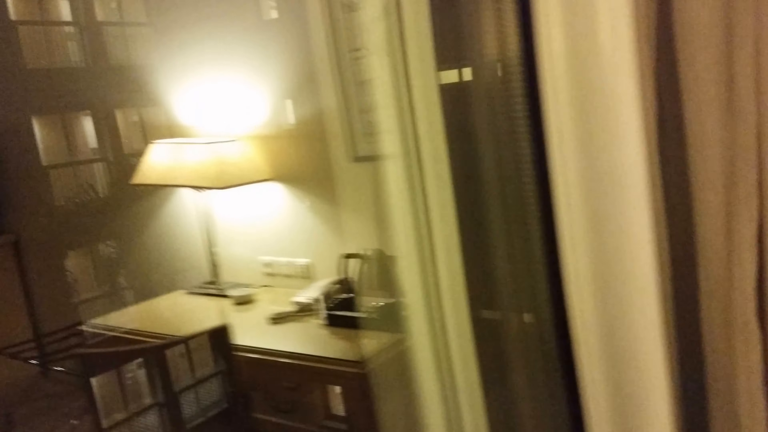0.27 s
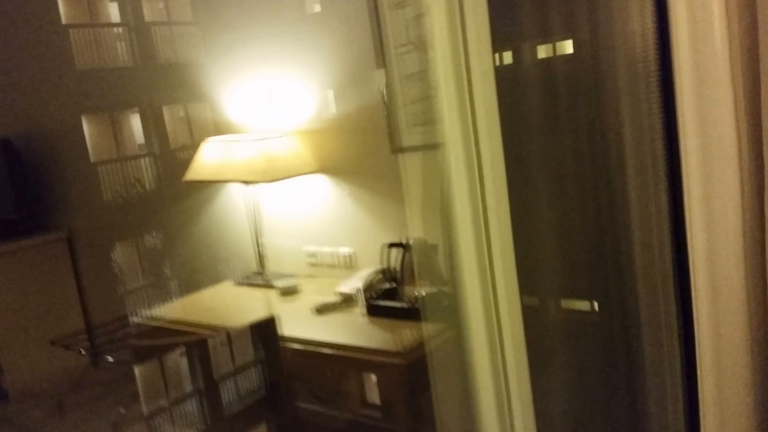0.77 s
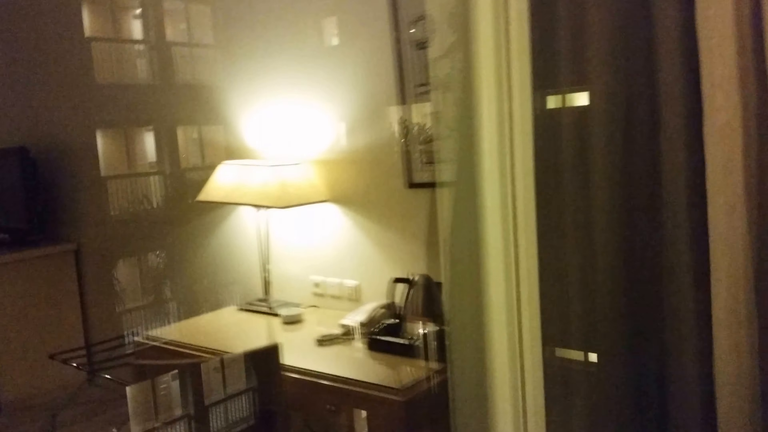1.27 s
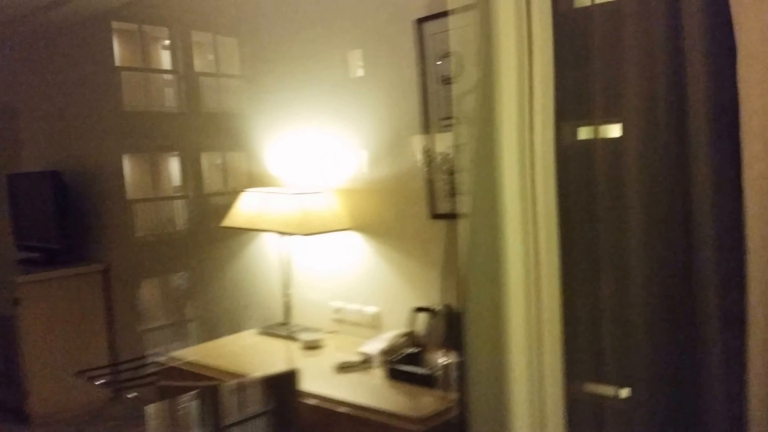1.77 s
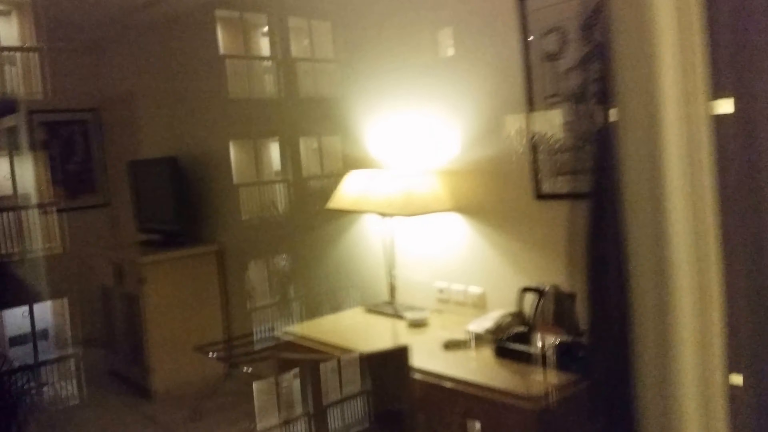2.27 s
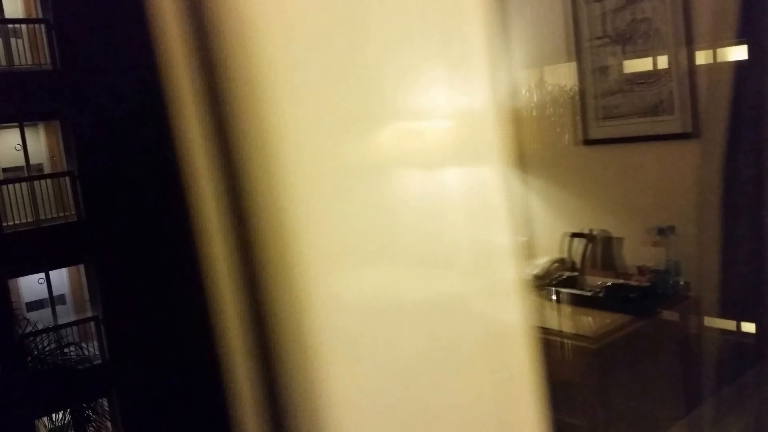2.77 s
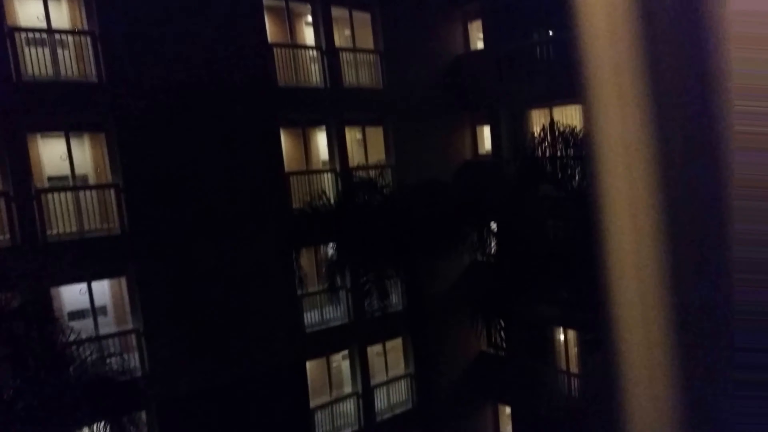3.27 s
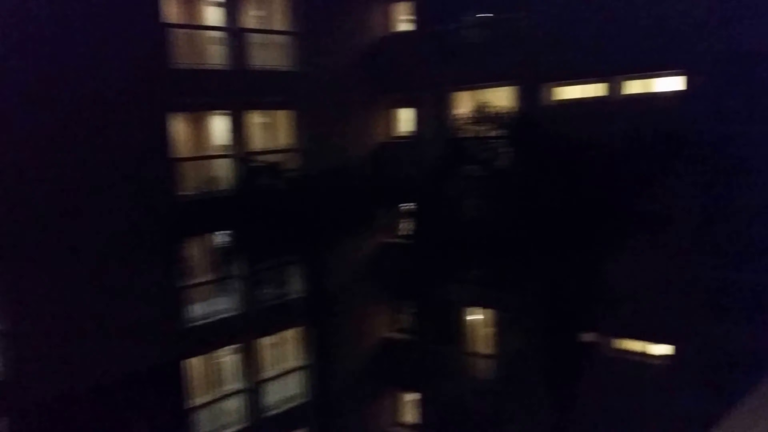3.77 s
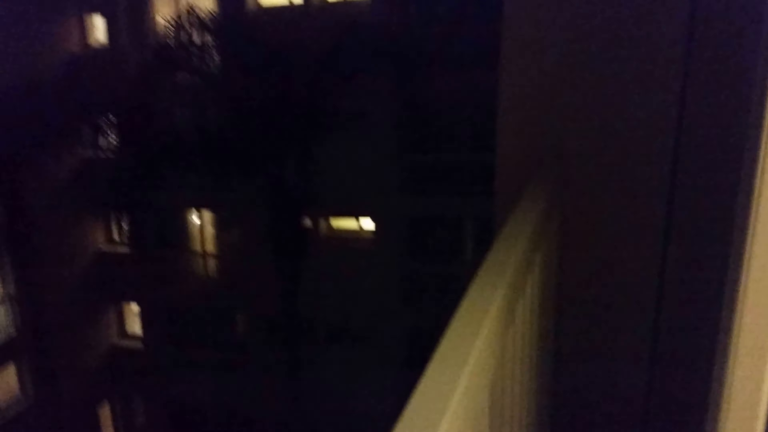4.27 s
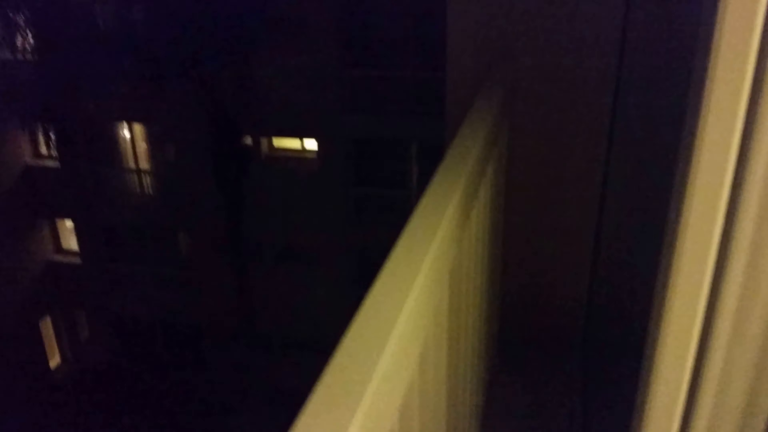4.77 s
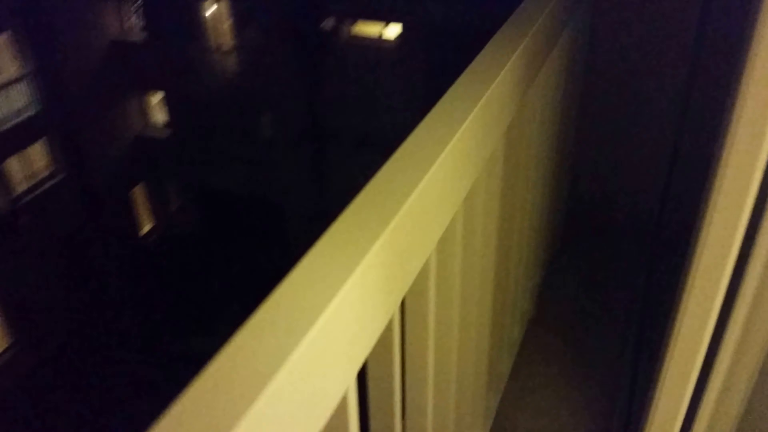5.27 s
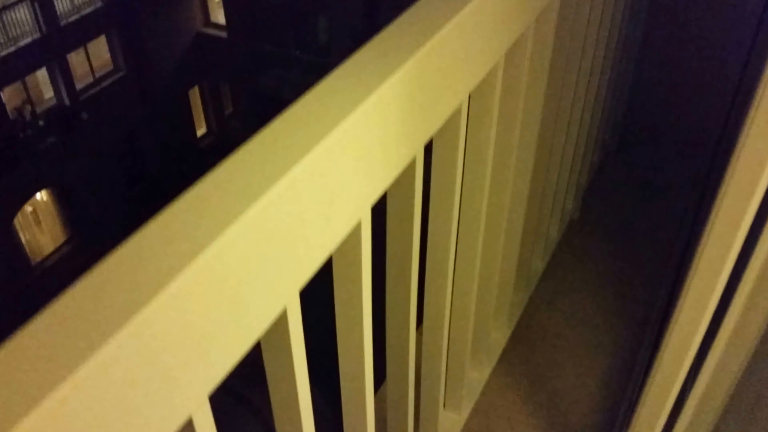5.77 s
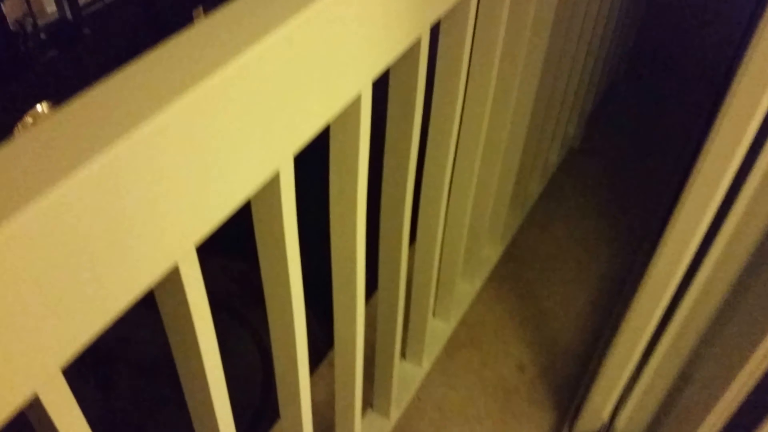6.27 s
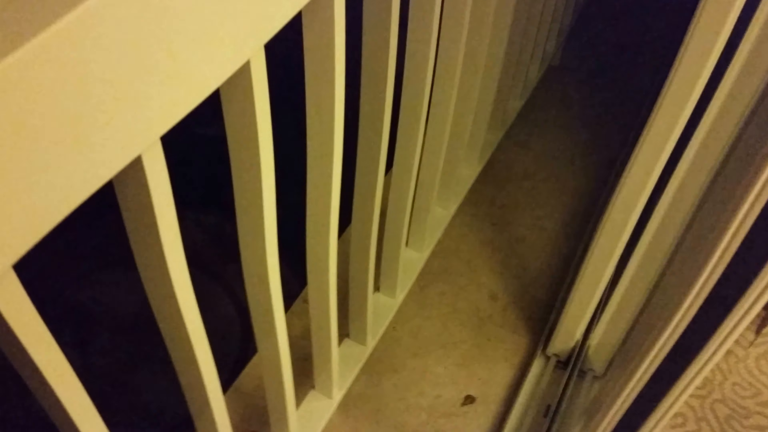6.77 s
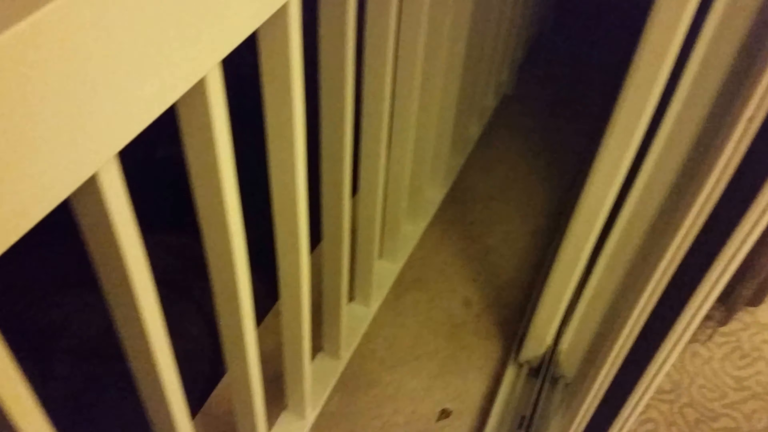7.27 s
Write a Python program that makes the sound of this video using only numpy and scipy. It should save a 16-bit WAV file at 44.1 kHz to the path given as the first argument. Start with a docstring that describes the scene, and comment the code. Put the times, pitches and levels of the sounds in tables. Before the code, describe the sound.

In a hotel room, a curtain brushes briefly as a glass balcony door rolls along its track, low rumble and brushy hiss swelling under thin, fluttering squeals. The frame clacks sharply on its stop and rings briefly. Stepping outside, the handheld stereo microphone meets low courtyard rumble, fan drone and airy hiss, with small taps, faint cloth and finally a dull hollow knock.

```python
"""In a hotel room, a sliding glass balcony door rolls open: its wheels drum the pane with filtered noise,
the brush seal hisses, and the track squeals with wandering sine tones. Bursts of noise and ringing notes make
the frame clack against its stop. The listener moves out into the night-time courtyard, made of rumbling noise,
droning fans and airy hiss. Light noise-and-note taps and soft cloth swishes are heard, then a hollow knock on
the door frame, made of dying notes and noise."""
import sys
import numpy as np
from scipy import signal
from scipy.fft import rfft, irfft
from scipy.io import wavfile

SR = 44100
rng = np.random.default_rng(int(sys.argv[2]) if len(sys.argv) > 2 else 0)


def store_pcm(level_fs):
    """Save levels as 16-bit WAV."""
    pcm = np.round(np.clip(level_fs, -1, 1) * 32767).astype(np.int16)
    wavfile.write(sys.argv[1], SR, np.atleast_2d(pcm).T)


N = 331632
T = np.arange(N) / SR  # time of each sample, s
HZ = np.maximum(np.arange(N // 2 + 1) * SR / N, 1)  # frequencies used by the filters

# Colour and mode levels are relative, and their sounds set the loudness; cloth and tap levels are used
# as they stand.
# tone colour of the pane, drummed by the wheels: f/Hz, level/dB
PANE_COLOUR = [(15, -42), (25, -15.5), (43, -12.5), (82, -0.5), (156, -2), (258, -12.5), (284, -12),
               (334, -23.5), (386, -17.5), (426, -47.5), (484, -21.5), (560, -47), (628, -31), (1200, -40),
               (1560, -70), (2640, -120)]
# tone colour of the brush seal on the aluminium track: f/Hz, level/dB
SEAL_COLOUR = [(300, -22), (520, -3), (900, -2), (1500, -6), (2150, -6), (2900, -16), (4500, -22),
               (5400, -17.5), (6500, -21), (8100, -21), (9500, -15.5), (12200, -17), (13800, -19),
               (16000, -18.5)]
# the wheels jolt on uneven spots of the track: t/s, level/dB
TRACK_JOLTS = [(0.0, -30.5), (1.49, -32.5), (1.876, -29), (2.04, -32.5)]
# cloth brushes past, first the curtain, then a sleeve: t/s, length/s, level/dB, centre f/Hz, width/octaves
CLOTH_SWISHES = [(-.2, 0.4, -52, 1560, 0.21), (-.2, 0.35, -43.5, 2340, 1.22), (3.494, 0.42, -76, 4200, 1.2),
                 (3.578, 0.28, -56, 1190, 0.33), (5.517, 0.21, -65.5, 5100, 0.44),
                 (5.48, 0.28, -74.5, 11400, 0.53), (5.656, 0.29, -72.5, 10250, .4)]
# tone colour of the traffic rumble: f/Hz, level/dB
RUMBLE_COLOUR = [(12, -58.5), (20, -22.5), (32, -14.5), (51, -10), (109, -3.5), (184, -11), (266, -11.5),
                 (435, -20), (505, -26.5), (577, -26), (700, -32.5), (910, -54.5), (1540, -120)]
# ventilation fans: f/Hz, width/Hz, level/dB
FAN_BANDS = [(62, 7.2, -8.5), (112.7, 11, 0), (221.3, 5, -6), (267.5, 2.4, -8.5)]
# tone colour of the airy outdoor hiss: f/Hz, level/dB
AIR_COLOUR = [(350, -28), (600, -3.5), (920, -2), (1300, -7), (1520, -10), (2100, -9), (2800, -23.5),
              (4400, -35.5), (5350, -33.5), (6300, -41.5), (8300, -49.5), (10500, -43.5), (13000, -42),
              (15500, -33)]
# one wheel catches and shrieks: t/s, length/s, f/Hz, level/dB
SHRIEK_CATCHES = [(.015, .085, 9100, -44), (.135, 0.12, 9500, -46), (.271, .1, 10000, -43.5),
                  (.385, 0.07, 10500, -40), (.486, 0.12, 11100, -47), (.565, 0.11, 10900, -34.5),
                  (.728, 0.068, 11450, -36.5), (.8, 0.41, 12200, -54.5), (1.096, 0.12, 12100, -47.5),
                  (1.2, .22, 12500, -59), (1.76, .71, 9750, -56.5), (2.044, .23, 9550, -56)]
# close notes inside the shriek: share of the pitch, level/dB
SHRIEK_STRANDS = [(.945, -4), (1., 0.5), (1.055, -5)]
# the other wheel whistles: t/s, length/s, level/dB
WHISTLE_CATCHES = [(.39, 0.2, -68), (.575, 0.076, -56), (.665, 0.1, -50), (.77, 0.14, -55.5),
                   (.92, 0.11, -53), (1.025, 0.12, -50), (1.15, .37, -53), (1.5, .22, -60), (1.7, .05, -54)]
# the frame meets its stop and chatters: t/s, level/dB
STOP_CONTACTS = [(2.4225, -34), (2.465, -27), (2.4765, -10.5), (2.4778, 1), (2.4793, 2), (2.4843, -6),
                 (2.4895, -16)]
# ringing notes of the metal frame: f/Hz, level/dB, time to fall 60 dB/s
FRAME_MODES = [(280, -17.5, .3), (487, -19.5, 0.29), (666, -8, .2), (990, -9, 0.22), (1270, -17, 0.252),
               (1580, -24.5, .25), (1986, -3.5, 0.21), (2087, -1, 0.16), (2367, 4, 0.18), (2450, -7, .17),
               (2780, -21.5, 0.13), (5636, -23.5, .15)]
# tone colour of metal striking metal: f/Hz, level/dB
CRACK_COLOUR = [(150, -33.5), (300, -17), (1000, -2.5), (1700, -7.5), (2200, 5.5), (3000, -25), (3850, -12),
                (4700, -26), (5500, -7), (6500, -24.5), (7400, -18), (11500, -19), (16000, -25)]
# tone colour of the room's answer: f/Hz, level/dB
ROOM_COLOUR = [(180, -39), (300, -13.5), (478, -8), (900, -4), (1080, -12), (1230, -10), (1480, -8),
               (2440, -4.5), (3240, -21), (5430, -17), (6410, -21), (12700, -25), (16000, -38.5)]
# light taps: t/s, level/dB, ring f/Hz, ring level/dB, tilt/(dB per octave), time to fall 60 dB/s
LIGHT_TAPS = [(3.305, -40, 646, -5, -2.5, .08), (3.6, -48, 1130, 6, 5, .2), (3.685, -55, 1130, 7, 0, .3),
              (3.973, -24, 900, -12, -2.5, .035), (3.9845, -29, 520, -9, -3.5, .07),
              (6.005, -43, 560, -3, -1, .25), (6.154, -41, 606, -5, -1, .05)]
# tone colour of a tap before its tilt: f/Hz, level/dB
TAP_NOISE_COLOUR = [(120, -12), (330, -2), (950, 1), (1500, -4), (2300, -13), (3300, -27), (5500, -35),
                    (8000, -46), (15000, -58)]
# contacts in the hollow knock's rattle: t/s, level/dB
KNOCK_CONTACTS = [(6.7185, 5.5), (6.7325, 5), (6.7505, -8), (6.764, -20)]
# ringing notes of the hollow sill: f/Hz, level/dB, time to fall 60 dB/s
SILL_MODES = [(173.6, -12, 0.25), (319, -6.5, 0.32), (463, -3, 0.3), (518, -1.5, 0.44), (571, -0.5, 0.33),
              (610, -9, 0.3), (646, -13, 0.16), (940, -6, 0.26), (1123, -14, 0.36), (1350, -17, 0.25),
              (1395, -16, 0.1)]
# tone colour of the knock's noise: f/Hz, level/dB
KNOCK_NOISE_COLOUR = [(150, -16), (300, -7), (540, 5), (750, -10.5), (1350, -7), (1650, -19), (2900, -27.5),
                      (3500, -40.5), (5600, -33.5), (8500, -50), (15500, -58)]
# difference in tone between the two microphone ports: f/Hz, left minus right level/dB
PORT_BALANCE = [(60, 0.5), (110, 3.5), (200, 2), (380, 4), (700, 3), (1290, -0.5), (2380, -1.5),
                (4400, 0.5), (8120, -2), (15000, -1)]

# one shove swells and ebbs, then the door coasts to its stop
PUSH_S, PUSH_WIDTH_S, STOP_S = .7, .58, 2.478
COAST_DB, PUSH_DB = -38.5, 10.5  # wheel rumble while coasting, before its trim; what the shove adds
SEAL_DB, SEAL_PUSH_DB = -51, 1.94  # the same for the seal's hiss
JOLT_T60_S = 0.6
# the courtyard grows as the gap widens, and again as the listener crosses the threshold
GAP_OPENS_S, GAP_LENGTH_S = 1.5, .8
STEP_OUT_S, STEP_LENGTH_S = 3.384, .33
# out of doors; change in the doorway; further change behind the shut door
RUMBLE_DB, RUMBLE_DOORWAY_DB, RUMBLE_SHUT_DB = -36.5, -5, -1.5
AIR_DB, AIR_DOORWAY_DB, AIR_SHUT_DB = -49.3, -7, -16
SQUEAL_RISE = 0.029  # share by which the pitch climbs during a catch
# the whistle's pitch climbs as the wheel runs in, and levels off
WHISTLE_START_HZ, WHISTLE_TOP_HZ, WHISTLE_CLIMB_S, WHISTLE_SETTLE_S = 6280, 7460, .6, .2
TOP_HZ = 15800  # the treble is cut above this


def undb(db):
    """Turn decibels into gain."""
    return 10 ** (np.asarray(db) / 20)


def unit(x):
    """Scale to an average (rms) strength of 1."""
    return x / np.sqrt(np.mean(x ** 2))


def gains(points):
    """Draw a gain for every frequency through (f/Hz, level/dB) points."""
    hz, db = np.transpose(points)
    return undb(np.interp(np.log(HZ), np.log(hz), db))


def shape(x, gain):
    """Filter by a gain at every frequency."""
    return irfft(rfft(x) * gain, N)


def walk(rate):
    """Smooth random wandering with spread 1 that changes about rate times a second."""
    return unit(shape(rng.standard_normal(N), np.exp(-(HZ / rate) ** 2)))


def noise(gain, spread):
    """Coloured stereo noise; spread sets how much the sides differ, growing towards the treble."""
    mid, side = rng.standard_normal((2, N))
    side = shape(side, np.minimum(spread * (1 + HZ / 2500), 1))
    return unit(shape(mid + np.array([side, -side]), gain))


def decay(t, t60):
    """Die away by 60 dB in t60 seconds."""
    return np.exp(-np.log(1000) * t / t60)


def fade(t60, start=0, attack=0.00023):
    """A quick start that dies away by 60 dB in t60 seconds."""
    t = np.maximum(T - start, 0)
    return (1 - np.exp(-(t / attack) ** 2)) * decay(t, t60)


def ramp(start, length):
    """Rise from 0 to 1 and stay there."""
    return np.clip((T - start) / length, 0, 1)


def swell(start, length):
    """A rounded rise and fall."""
    return np.sqrt(np.abs(np.sin(np.pi * ramp(start, length))))


def catches(rows):
    """Join overlapping swells from (t/s, length/s, level/dB) rows into one loudness curve."""
    return np.sqrt(sum((undb(db) * swell(s, length)) ** 2 for s, length, db in rows))


def tone(hz):
    """A sine wave on a moving pitch."""
    return np.sin(2 * np.pi * np.cumsum(hz) / SR)


def convolve(x, response):
    """Pass a sound through an echo pattern."""
    return signal.fftconvolve(np.atleast_2d(x), np.atleast_2d(response), axes=-1)[:, :N]


def pan(x, db):
    """Make the left louder than the right by db; a negative value leans right."""
    return x * undb(np.array([[db], [-db]]) / 2)


def from_left(x, lag_s, onset_hz=900):
    """Place a source to the left: its sound reaches the right later, most of all in the treble."""
    lag = 2 * np.pi * HZ * lag_s * (1 - 0.74 * np.exp(-(HZ / onset_hz) ** 2))
    return shape(x, np.exp(-1j * np.array([0 * lag, lag])))


def blows(contacts, modes, crack_t60):
    """The hardest contact sets the notes ringing; all contacts shape the loudness of the chatter."""
    hz, db, t60 = np.transpose(modes)[:, :, None]
    hardest_s = max(contacts, key=lambda row: row[1])[0]
    t = np.maximum(T - hardest_s, 0)
    phase = rng.uniform(0, 2 * np.pi, hz.shape)
    ring = np.sum(undb(db) * np.sin(2 * np.pi * hz * t + phase) * decay(t, t60), 0)
    chatter = np.sqrt(sum((undb(size_db) * fade(crack_t60, s)) ** 2 for s, size_db in contacts))
    return ring * (1 - np.exp(-t / 0.0011)), chatter  # the ring builds up softly


def cloth(grain_db=2):
    """Fabric brushes past: grainy noise is narrowed to a band and swells softly."""
    out, fibres = 0, noise(1, spread=0.59) * undb(grain_db * walk(130))
    for s, length, db, hz, octaves in CLOTH_SWISHES:
        stroke = swell(s, length) ** 4
        band = np.exp(-(np.log2(HZ / hz) / octaves) ** 2)
        out = out + undb(db) * stroke * unit(shape(fibres, band))
    return out


def rolling(rumble_db=-1, bump_db=1.3, grit_db=1):
    """Wheels bump along the track and drum the pane; the seal hisses; both die away at the stop."""
    push = np.exp(-((T - PUSH_S) / PUSH_WIDTH_S) ** 2)
    moving = undb(-85 * np.maximum(T - STOP_S, 0))  # falls by 85 dB per second after the stop
    jolts = sum(undb(db) * fade(JOLT_T60_S, s, attack=.006) for s, db in TRACK_JOLTS)
    wheels = np.hypot(undb(COAST_DB + PUSH_DB * push), jolts)
    bumps = undb(rumble_db + bump_db * walk(9.6))
    rumble = noise(gains(PANE_COLOUR), spread=0.18) * wheels * bumps
    rubbing = undb(SEAL_DB + SEAL_PUSH_DB * push + grit_db * walk(40))
    hiss = noise(gains(SEAL_COLOUR), spread=0.39) * rubbing
    return moving * (rumble + hiss)


def courtyard(throb_db=1.25, fan_db=-5):
    """Traffic rumble and droning fans, both noise, with an airy hiss that opens up out of doors."""
    shut = 1 - ramp(GAP_OPENS_S, GAP_LENGTH_S)
    indoors = 1 - ramp(STEP_OUT_S, STEP_LENGTH_S)
    low_db = RUMBLE_DB + RUMBLE_DOORWAY_DB * indoors + RUMBLE_SHUT_DB * shut
    high_db = AIR_DB + AIR_DOORWAY_DB * indoors + AIR_SHUT_DB * shut
    rumble = noise(gains(RUMBLE_COLOUR), spread=0.26) * undb(throb_db * walk(10))
    fan_gain = sum(undb(db) * np.exp(-((HZ - hz) / width) ** 2) for hz, width, db in FAN_BANDS)
    fans = noise(fan_gain, spread=0.24)  # narrow bands of noise throb by themselves
    air = noise(gains(AIR_COLOUR), spread=0.45) * undb(.5 * walk(6))
    return undb(low_db) * (rumble + undb(fan_db) * fans) + undb(high_db) * air


def shrieking(skirt_db=-9):
    """One wheel sticks and slips, making close, fluttering notes roughened by grit."""
    flutter, rasp = .018, .014  # slow and fast pitch wobble, as shares of the pitch
    pitch = np.full(N, float(SHRIEK_CATCHES[0][2]))
    for s, length, hz, db in SHRIEK_CATCHES:
        pitch = np.where(T >= s, hz * (1 + SQUEAL_RISE * (ramp(s, length) - .5)), pitch)
    notes = 0
    for share, db in SHRIEK_STRANDS:
        wobble = 1 + flutter * walk(55) + rasp * walk(1200)
        notes = notes + tone(share * pitch * wobble) * undb(db + 4.0 * walk(60))
    skirt = tone(pitch) * walk(1600)  # grit on the track
    grip = catches((s, length, db) for s, length, hz, db in SHRIEK_CATCHES)
    return (unit(notes) + undb(skirt_db) * skirt) * grip


def whistling():
    """The other wheel sticks and slips, making one wavering tone that climbs and levels off."""
    wander, waver, rough = .014, .011, .021  # slow to fast pitch wobble, as shares of the pitch
    settle = np.exp(-np.maximum(T - WHISTLE_CLIMB_S, 0) / WHISTLE_SETTLE_S)
    pitch = WHISTLE_TOP_HZ + (WHISTLE_START_HZ - WHISTLE_TOP_HZ) * settle
    wobble = 1 + wander * walk(9.2) + waver * walk(40) + rough * walk(900)
    return unit(tone(pitch * wobble) * undb(3.2 * walk(35))) * catches(WHISTLE_CATCHES)


def squealing(echo_db=-4, shriek_db=-2.5, whistle_db=-3.0):
    """Both squealing wheels sound together; the room smears them with a dying noise echo."""
    direct = shrieking() * undb(shriek_db) + whistling() * undb(whistle_db)
    walls = noise(1, spread=0.73) * fade(0.29)
    return direct + undb(echo_db) * convolve(direct, unit(walls) / np.sqrt(N))


def door_stop(ring_db=-22, crack_db=-13.8, room_db=-28.4, rattle_db=-24, rattle_hz=1200,
              crack_t60=0.035, rattle_t60=0.28, room_t60=0.55, left_db=-1.0):
    """The frame clacks on its stop, rings and rattles briefly and wakes the room."""
    ring, contact = blows(STOP_CONTACTS, FRAME_MODES, crack_t60)
    crack = noise(gains(CRACK_COLOUR), spread=.3) * contact
    rattle_band = np.exp(-(np.log2(HZ / rattle_hz) / 0.84) ** 2)
    rattle = noise(rattle_band, spread=0.58) * fade(rattle_t60, 2.479)
    room = noise(gains(ROOM_COLOUR), spread=0.4) * fade(room_t60, 2.484)
    clack = undb(ring_db) * ring + undb(crack_db) * crack
    return pan(clack + undb(rattle_db) * rattle + undb(room_db) * room, left_db)


def taps():
    """Each tap is a short burst of noise with one note ringing in it."""
    out, burst = 0, noise(gains(TAP_NOISE_COLOUR), spread=0.069)
    for s, db, hz, ring_db, tilt_db, t60 in LIGHT_TAPS:
        click = unit(shape(burst, undb(tilt_db * np.log2(HZ / 1000))))
        note = undb(ring_db) * np.sin(2 * np.pi * hz * (T - s))
        out = out + undb(db) * fade(t60, s, attack=0.0015) * (click + note)
    return out


def sill_knock(start=6.7145, ring_db=-23, crack_db=-23, tail_db=-27, thump_db=-14, thump_hz=520,
               crack_t60=0.087, tail_t60=.5):
    """A dull knock on the hollow frame: a few strong swings, a rattle, the echo of the balcony walls."""
    ring, contact = blows(KNOCK_CONTACTS, SILL_MODES, crack_t60)
    thump = np.square(swell(start, 0.0047)) * np.sin(2 * np.pi * thump_hz * (T - start))
    colour = gains(KNOCK_NOISE_COLOUR)
    crack = noise(colour, spread=0.55) * contact
    tail = noise(colour / (1 + HZ / 4000), spread=0.73) * fade(tail_t60, 6.72, attack=.004)
    return undb(ring_db) * ring + undb(thump_db) * thump + undb(crack_db) * crack + undb(tail_db) * tail


def scene(door_lag_s=.00033, yard_lag_s=.00041, knock_lag_s=0.00024):
    """Door, courtyard and knock come from the left; taps and cloth come from straight ahead."""
    door = from_left(rolling() + squealing() + door_stop(), door_lag_s)
    yard = from_left(courtyard(), yard_lag_s)
    knock = from_left(sill_knock(), knock_lag_s)
    return door + yard + knock + taps() + cloth()


def record(dry):
    """Two microphone ports colour the sound differently, and a steep filter cuts the top."""
    lean = np.sqrt(gains(PORT_BALANCE))
    heard = shape(dry, np.array([lean, 1 / lean]))
    low_pass = signal.ellip(10, .2, 90, TOP_HZ, fs=SR, output="sos")
    return signal.sosfilt(low_pass, heard)


dry = scene()
out = record(dry)
store_pcm(out)
```